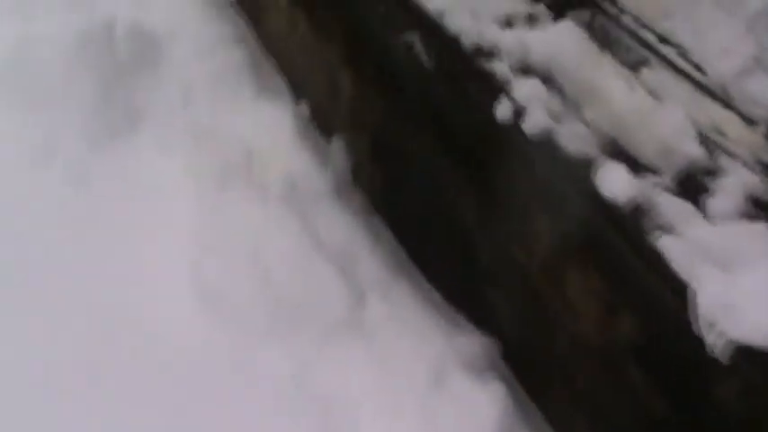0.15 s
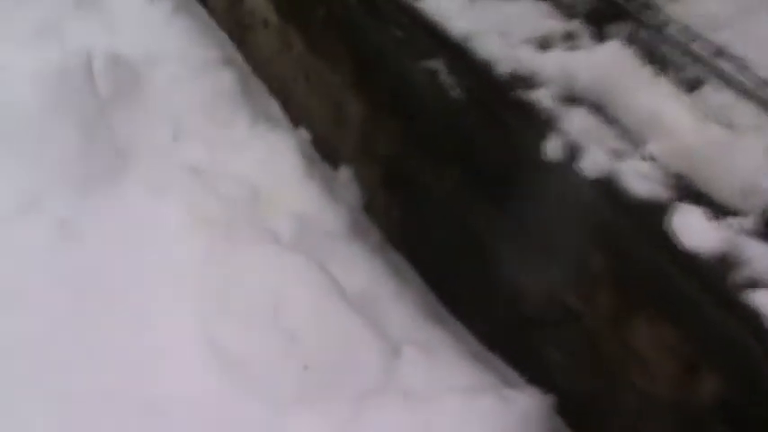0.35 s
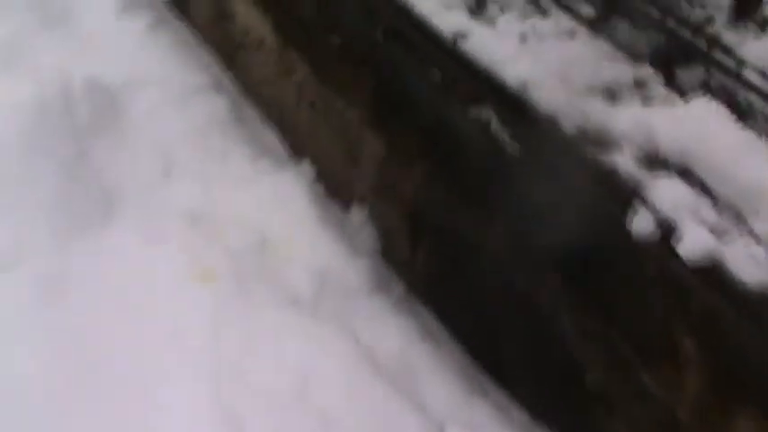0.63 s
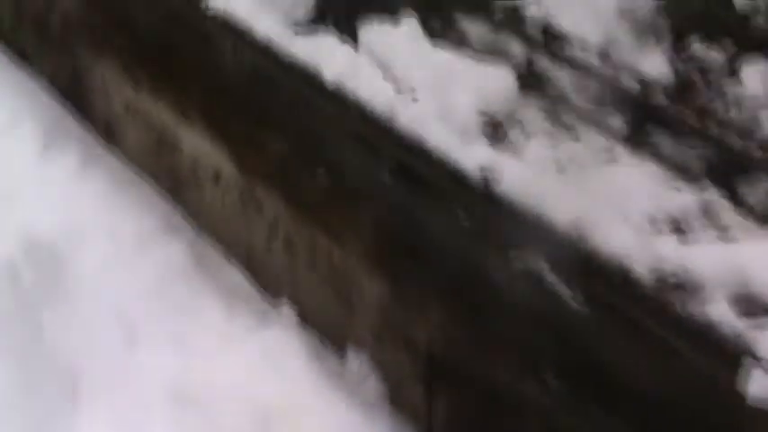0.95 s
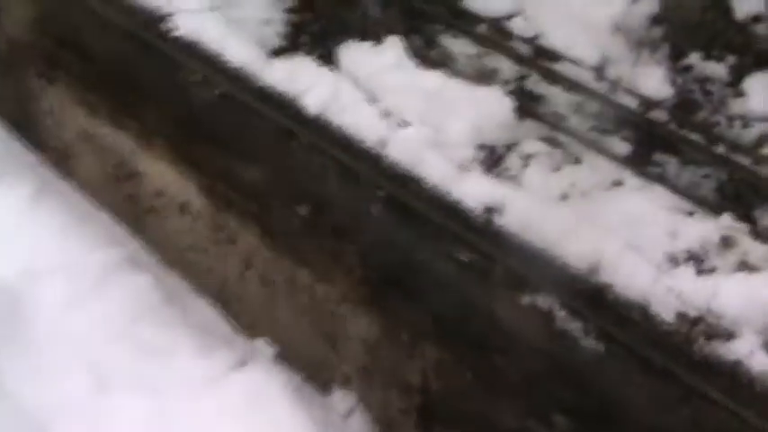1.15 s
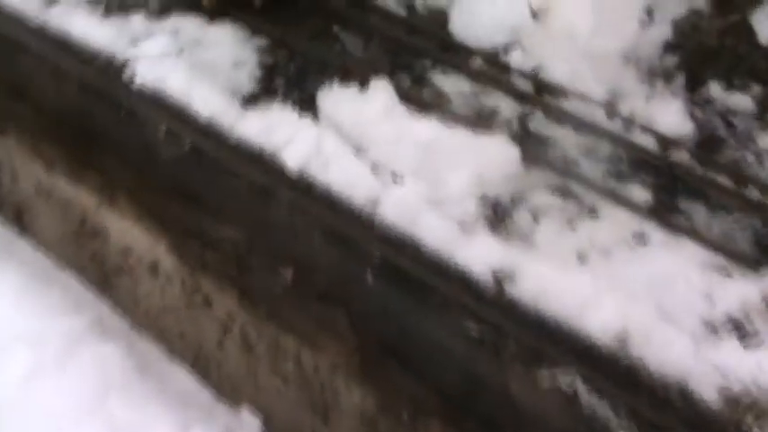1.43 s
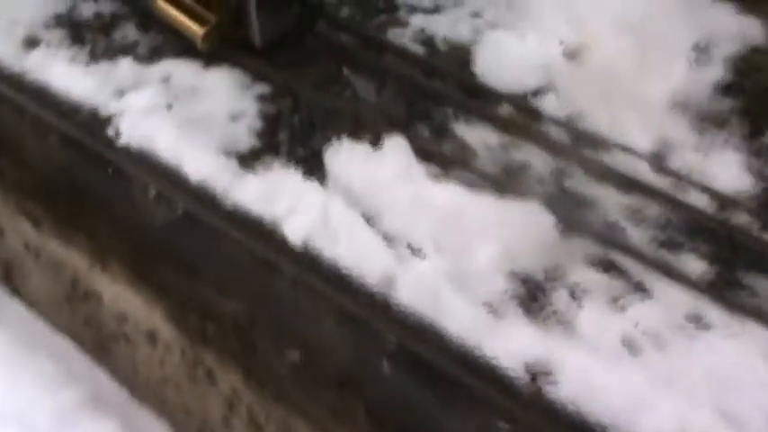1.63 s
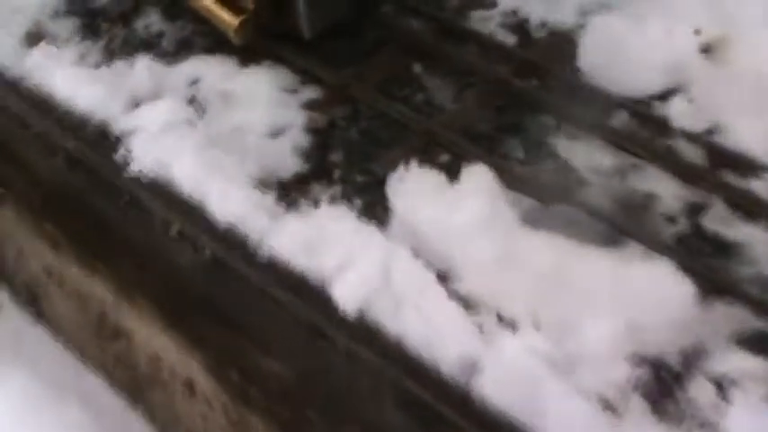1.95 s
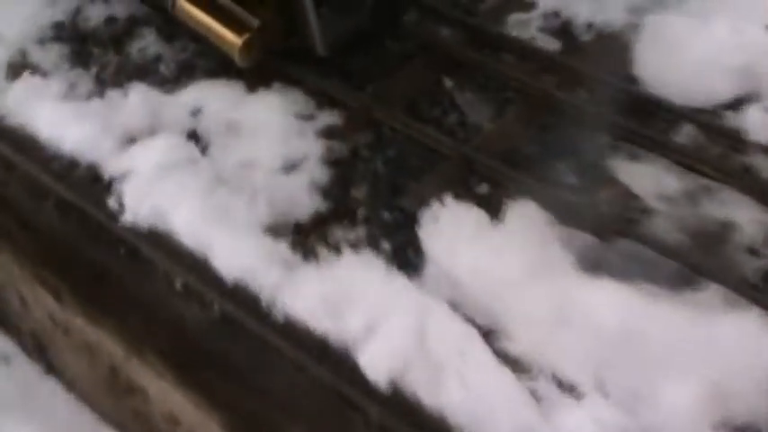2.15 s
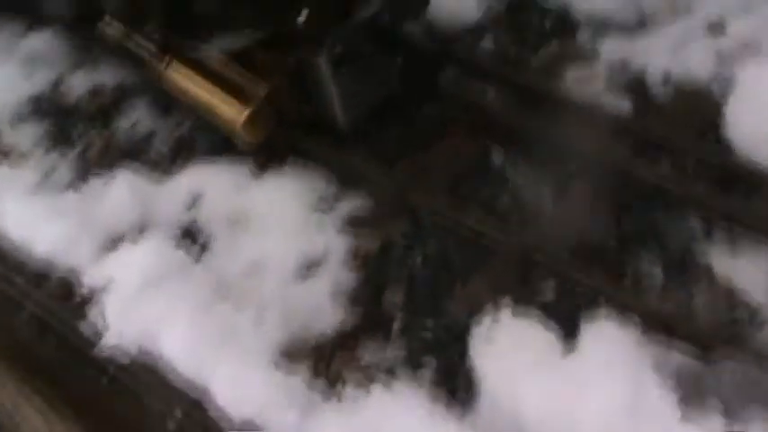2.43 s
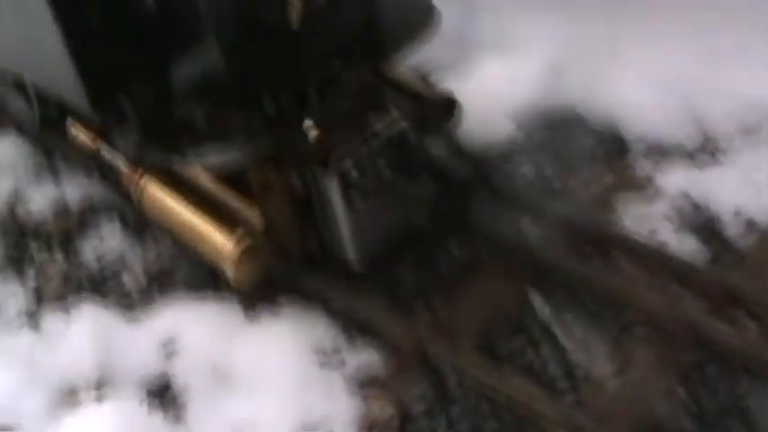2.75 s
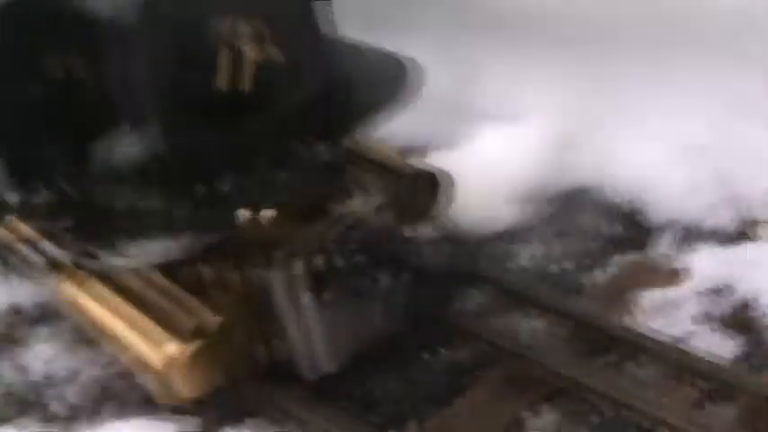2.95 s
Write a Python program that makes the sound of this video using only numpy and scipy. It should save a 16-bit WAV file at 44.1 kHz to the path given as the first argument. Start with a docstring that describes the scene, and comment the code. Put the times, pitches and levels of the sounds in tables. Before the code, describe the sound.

Steam hisses from a model locomotive's cylinder, swelling then steady, with early handling knocks on the camera.

```python
"""A hand-held camera nears a model locomotive in snow: a steam jet of patchy noise swells over three seconds,
its pipe mouth ringing as a breathy band; drifting late copies from track bed and snow banks comb the hiss.
Early on, slips of the fingers knock, snap and creak the case (damped sines); a few more follow later.
A hollow murmur of band noise comes and goes in the second half; near the end ring and top of the jet fade.
Throughout, shaped noise gives a distant outdoor rumble, and gates make the stereo width flicker."""
import sys
import numpy as np
from scipy import signal
from scipy.fft import rfft, irfft, next_fast_len
from scipy.io import wavfile
from scipy.ndimage import uniform_filter1d, map_coordinates

SR = 44100
rng = np.random.default_rng(int(sys.argv[2]) if len(sys.argv) > 2 else 0)


def linear_from_db(decibels):
    """Turn decibels (scalar or array-like) into linear amplitude factors; 0 gives 1."""
    return 10 ** (np.asarray(decibels, float) / 20)


def log_audio(samples):
    """Write samples as a 16-bit WAV file to the path given in sys.argv[1]."""
    # one column per channel
    frames = np.atleast_2d(samples).T
    # limit to full scale, then quantise
    limited = np.clip(frames, -1, 1)
    pcm = np.round(limited * 32767).astype(np.int16)
    wavfile.write(sys.argv[1], SR, pcm)


N = 136710
T = np.arange(N) / SR


def unit(x):
    """Scaled to rms 1."""
    return x / np.sqrt(np.mean(x ** 2) + 1e-20)


def along(points, hz):
    """(Hz, value) points interpolated on a log frequency axis."""
    point_hz, values = np.transpose(points)
    return np.interp(np.log(hz + 1), np.log(point_hz + 1), values)


def over_time(points):
    """(s, value) points interpolated at every sample."""
    return np.interp(T, *np.transpose(points))


def wobble(knots_per_s):
    """A smooth random curve through normally distributed knots."""
    knots = rng.standard_normal(int(N * knots_per_s / SR) + 4)
    return map_coordinates(knots, [T * knots_per_s])


def swell(start_s, end_s):
    """A half-sine rise and fall between two times."""
    return np.sin(np.pi * np.clip((T - start_s) / (end_s - start_s), 0, 1))


def during(spans, edge=512):
    """1 inside the spans, 0 outside, with edges ramped over edge samples."""
    inside = sum((T >= start_s) & (T < end_s) for start_s, end_s in spans) * 1.
    return uniform_filter1d(inside, size=edge)


def filtered(x, response):
    """x with its spectrum times a response of frequency in Hz."""
    size = next_fast_len(N + 8192)
    return irfft(rfft(x, size) * response(np.fft.rfftfreq(size, 1 / SR)), size)[..., :N]


def resonance(hz, centre_hz, width_hz):
    """Complex response of a damped resonator, 1 at its centre."""
    damping = 1j * hz * width_hz
    return damping / (centre_hz ** 2 - hz * hz + damping)


def patchy_noise(patchy_db, channels=1):
    """White noise with time-frequency patches of random gain, the same patches in all channels."""
    z = signal.stft(rng.standard_normal((channels, N)), nperseg=512)[2]
    field = uniform_filter1d(rng.standard_normal(z.shape[1:]), size=5, axis=0)
    field = uniform_filter1d(field, size=24, axis=1)
    return signal.istft(z * linear_from_db(patchy_db * unit(field)), nperseg=512)[1][:, :N]


def pipe_ring():
    """The pipe mouth resonates to turbulence: noise through two-stage resonators."""
    # Each row: centre in Hz, width of one stage in Hz, gain in dB.
    pipe_modes = [(6810, 810, 4.5), (7370, 400, -6)]

    def mouth(hz):
        return sum(linear_from_db(db) * resonance(hz, centre_hz, width_hz) ** 2
                   for centre_hz, width_hz, db in pipe_modes)

    return unit(filtered(patchy_noise(patchy_db=1.0, channels=2), mouth))


def jet():
    """Turbulent steam: noise in two colours by angle to the jet, plus the ring of the pipe mouth."""
    # The approach. Each row: time in seconds, jet level in dB, ring over the jet in dB,
    # share of the on-axis colour from 0 to 1.
    approach = [(0, -24.5, -7.5, 0.4), (.3, -21.5, -12.5, 0.55), (.6, -18.5, -8, 0.38),
                (.9, -17, -5.5, 0.38), (1.148, -14.5, -5.5, 0.32), (1.36, -13, -5, 0.16),
                (1.42, -15, -3.5, 0.13), (1.7, -14.5, -4.5, 0.31), (2, -12, -9, 0.37),
                (2.4, -13, -9.5, 0.37), (2.74, -10.5, -13, 0.36), (2.82, -12, -29, 0.24),
                (3.01, -11, -38, 0.38), (3.1, -12.5, -25, 0.8)]
    # Jet colour from the side. Each row: frequency in Hz, density in dB per Hz.
    aside_colour = [(900, -52), (1500, -29), (2200, -21.5), (3500, -17), (3900, -10.5), (4600, -9.5),
                    (5300, -5.5), (7000, -0.5), (8200, -2), (10000, 1), (13000, -1.5), (15700, -3.5)]
    # Jet colour from in front. Each row: frequency in Hz, density in dB per Hz.
    ahead_colour = [(900, -60), (1600, -24.5), (2400, -15.5), (3000, -12.5), (3500, -11.5), (3850, -5),
                    (4200, -5.5), (4480, -8), (5300, -0.5), (6800, -2.5), (7300, -2.5), (7700, -6.5),
                    (8200, -4.5), (11500, -3), (13500, -4.5), (15700, -7.5)]
    # Top of the jet as the camera turns. Each row: time in seconds, gain in dB.
    sheen_points = [(0, -2), (.7, 4), (1.5, 2.5), (2.2, 2.5), (2.7, 0), (2.95, -1.5), (3.1, -11)]
    sheen_edge_hz = 12800
    surge_db, flutter_db = 0.5, 0.21  # slow and fast unsteadiness of the flow

    time_s, *columns = np.transpose(approach)
    level_db, ring_db, ahead = [np.interp(T, time_s, c) for c in columns]
    ahead = np.clip(ahead, 0, 1)
    noise = patchy_noise(patchy_db=0.58, channels=2)
    side_on = unit(filtered(noise, lambda hz: linear_from_db(along(aside_colour, hz))))
    head_on = unit(filtered(noise, lambda hz: linear_from_db(along(ahead_colour, hz))))
    ring = linear_from_db(ring_db + 0.58 * wobble(12.3)) * pipe_ring()
    steam = (1 - ahead) * side_on + ahead * head_on + ring
    top = filtered(steam, lambda hz: 1 / (1 + (sheen_edge_hz / (hz + 1)) ** 12))
    flow_db = level_db + surge_db * wobble(2.98) + flutter_db * wobble(30.25)
    return linear_from_db(flow_db) * (steam + (linear_from_db(over_time(sheen_points)) - 1) * top)


def bounced(x):
    """Direct sound plus late copies from track bed and snow, combing the hiss as path lengths drift."""
    # Surfaces that come into line as the camera moves. Each row: start in seconds, end in seconds,
    # extra path at start in metres, extra path at end in metres, peak gain at full_hz in dB
    # relative to the direct sound.
    surfaces = [(-.15, .8, .299, .314, -11), (-.1, .8, .17, .173, -15), (.7, 1.15, .271, .275, -21),
                (1, 2.05, .13, .131, -18), (1.3, 2.55, .69, .689, -19), (1.6, 2.05, .516, .516, -21),
                (2.05, 2.35, .284, .284, -16), (2.2, 2.65, .4, .411, -19), (2.35, 2.65, .2, .2, -19),
                (2.55, 3.2, .307, .314, -13)]
    full_hz = 11000  # small surfaces return treble best: gain grows as the root of frequency
    sway_m, sound_m_per_s = 0.001, 335  # the hand sways
    doubled = signal.resample_poly(filtered(x, lambda hz: np.sqrt(hz / full_hz)), 2, 1)
    total, power = x, 1
    for start_s, end_s, first_m, last_m, db in surfaces:
        gain = linear_from_db(db) * np.sqrt(swell(start_s, end_s))
        path_m = np.interp(T, [start_s, end_s], [first_m, last_m]) + sway_m * wobble(2.08)
        position = 2 * (np.arange(N) - path_m / sound_m_per_s * SR)
        total = total + gain * map_coordinates(doubled, [position], mode="mirror", order=3)
        power = power + gain ** 2
    return total / np.sqrt(power)


def steam_stereo():
    """Steam slightly left of the middle, a little of it unlike at the two ports."""
    # Colour of what differs between the ports. Each row: frequency in Hz, gain in dB.
    unlike_colour = [(1500, -3), (3000, 2.5), (5000, -4), (9000, -5.5), (15000, 0.5)]
    side_db, side_lean = -13.5, 0.28
    mid, unlike = jet()
    mid = bounced(mid)
    unlike = filtered(unlike, lambda hz: linear_from_db(along(unlike_colour, hz)))
    side = linear_from_db(side_db) * (side_lean * mid + unlike)
    return np.array([mid + side, mid - side])


def chatter():
    """Fine creaking while the grip shifts: random small slips, on the whole weakening over each span."""
    # Each row: start in seconds, end in seconds, base level in dB.
    shifts = [(0.129, 0.199, -33), (0.205, 0.291, -29.5), (0.737, 0.921, -36), (2.861, 3.052, -44.5)]
    slips_per_s, middle_hz = 220, 420
    fine = []
    for start_s, end_s, db in shifts:
        u, size, pitch = rng.random((int((end_s - start_s) * slips_per_s), 3)).T
        times_s = start_s + (end_s - start_s) * u
        levels_db = db - 1.8 * np.log(size + 0.044) - 6 * u
        fine += zip(times_s, levels_db, middle_hz * 2 ** (1.8 * (pitch - 0.5)))
    return fine


def grip():
    """Each finger slip is a dull damped knock plus a snap, carried through the case to both ports."""
    # Slips on the case. Each row: start in seconds, knock level before lean and case in dB, pitch in Hz.
    slips = [(.086, -29, 415), (0.1408, -28, 402), (0.1438, -25, 140), (.181, -22, 133), (.159, -21, 600),
             (.176, -23, 640), (0.1783, -11.5, 680), (0.1853, -16.5, 694), (.2075, -26, 450),
             (0.218, -24, 400), (0.229, -20, 600), (.236, -14.5, 680), (0.241, -25, 253),
             (0.2486, -15.5, 526), (.254, -24, 493), (.264, -27.5, 350), (0.276, -39, 350),
             (.284, -39, 400), (.729, -15.5, 493), (0.7318, -11.5, 347), (0.7391, -17, 412),
             (0.745, -19, 404), (0.7508, -22.5, 300), (0.76, -32, 300), (0.846, -37, 254),
             (0.885, -37, 250), (.898, -38, 300), (1.548, -26, 447), (1.554, -35, 420), (2.323, -23.5, 148),
             (2.332, -34, 190), (2.876, -24.5, 181), (2.882, -22.5, 181), (2.887, -30, 190),
             (2.897, -40, 170), (2.946, -30, 130), (2.954, -34, 120), (2.99, -28, 201),
             (3.0003, -23.5, 253), (3.015, -27, 224)]
    decay_cycles, rise_cycles = 0.47, 0.66
    left_db_per_octave = 2.1  # left over right, growing with pitch
    snap_db, snap_left_db, snap_peak_s = -11, 3.5, 0.0011
    case_hz, case_width_hz, case_gain = 350, 35, 0.8  # the hollow case rings briefly
    case_low_hz = 68  # the small case carries little below this

    out, t = np.zeros((2, N + 2048)), np.arange(2048) / SR
    for start_s, db, hz in slips + chatter():
        cycles = hz * t
        knock = np.sin(2 * np.pi * cycles) * np.exp(-cycles / decay_cycles)
        knock = knock * (1 - np.exp(-cycles / rise_cycles))
        knock = knock / np.abs(knock).max()
        phase, detune = rng.random(2)
        snap_hz = 1200 * (0.772 + 0.39 * detune)
        snap = np.sin(2 * np.pi * (snap_hz * t + phase))
        snap = snap * t / snap_peak_s * np.exp(1 - t / snap_peak_s)
        lean_db = left_db_per_octave * np.log2(hz / 130) / 2
        hard = np.clip(hz / 330, 0, 1) ** 2.1  # low-pitched slips snap less
        knocks = linear_from_db([[lean_db], [-lean_db]]) * knock
        snaps = hard * linear_from_db([[snap_db + snap_left_db], [snap_db - snap_left_db]]) * snap
        first = round(start_s * SR)
        out[:, first:first + len(t)] -= linear_from_db(db) * (knocks + snaps)

    def case(hz):
        low_cut = (1j * hz / (case_low_hz + 1j * hz)) ** 2
        return (1 + case_gain * resonance(hz, case_hz, case_width_hz)) * low_cut

    return filtered(out[:, :N], case)


def hollow():
    """A hollow murmur swells and fades: noise through a two-stage resonator."""
    # One row: start in seconds, end in seconds, centre in Hz, width of one stage in Hz,
    # level before the swell in dB.
    murmur = (1.33, 2.5, 534, 150, -46)
    start_s, end_s, centre_hz, width_hz, db = murmur
    noise = rng.standard_normal((2, N))
    mid, side = filtered(noise, lambda hz: resonance(hz, centre_hz, width_hz) ** 2)
    return linear_from_db(db) * swell(start_s, end_s) * unit(mid + 0.17 * side * [[1], [-1]])


def outdoors():
    """Far rumble and murmur of the open air: shaped noise, less alike left and right as pitch rises."""
    # Each row: frequency in Hz, relative density in dB per Hz.
    air_colour = [(12, -35), (20, -3), (146, -5), (167, -15.5), (204, -11), (279, -12.5), (493, -10),
                  (746, -10.5), (1320, -9), (2200, -17), (2860, -19), (4840, -120)]
    # Each row: frequency in Hz, left-right likeness (correlation, 0 to 1).
    likeness = [(30, 1), (150, 0.98), (500, .75), (1200, 0.67)]
    # Each row: time in seconds, gain in dB.
    air_swell = [(0, 0), (.5, 1), (1.1, 1.5), (1.8, 2), (2.4, 1), (3.1, 1.5)]

    def mid_side(hz):
        angle = np.arccos(np.clip(along(likeness, hz), -1, 1)) / 2
        return linear_from_db(along(air_colour, hz)) * [np.cos(angle), np.sin(angle)]

    mid, side = filtered(patchy_noise(patchy_db=1.2, channels=2), mid_side)
    level_db = -41.5 + over_time(air_swell) + 0.4 * wobble(5.7)
    return linear_from_db(level_db) * unit(np.array([mid + side, mid - side]))


def scene():
    """Steam, outdoor air, hollow murmur and handling noise at the two ports."""
    return steam_stereo() + outdoors() + hollow() + grip()


def band_limit(x):
    """A steep low-pass at the top of the band."""
    return signal.sosfilt(signal.butter(12, 16530, fs=SR, output="sos"), x)


def record(dry):
    """The camera's ceiling and band limit, then the flickering stereo width."""
    # Spans in which the treble is wide. Each row: start in seconds, end in seconds.
    wide_spans = [(.165, .225), (.25, .31), (.555, .61), (.885, .945), (1.065, 1.125), (1.235, 1.37),
                  (1.445, 1.5), (1.575, 1.675), (1.745, 1.885), (1.96, 2.06), (2.09, 2.15), (2.34, 2.4),
                  (2.765, 2.83), (2.895, 2.955)]
    # Spans with only scraps of width below the treble. Each row: start in seconds, end in seconds.
    thin_spans = [(2.17, 2.3), (2.46, 2.75), (3.02, 3.1)]
    top_hz, treble_hz, thin_share = 15750, 1260, 0.29
    left, right = filtered(np.clip(dry, -1, 1), lambda hz: hz < top_hz)
    mid, side = (left + right) / 2, (left - right) / 2
    treble = filtered(side, lambda hz: hz > treble_hz)
    low_width = 1 - (1 - thin_share) * during(thin_spans)
    side = (side - treble) * low_width + treble * during(wide_spans)
    return band_limit(np.array([mid + side, mid - side]))


dry = scene()
out = record(dry)
log_audio(out)
```